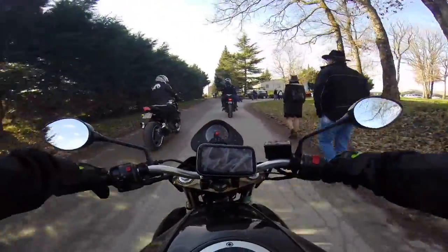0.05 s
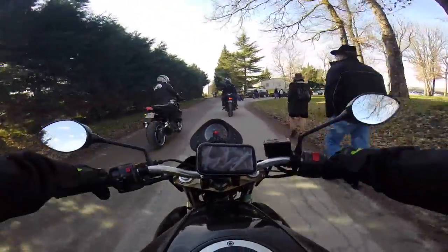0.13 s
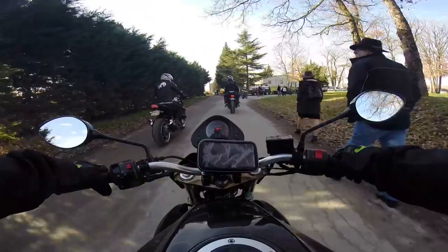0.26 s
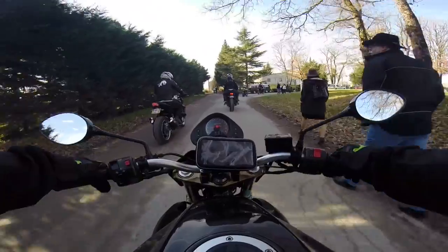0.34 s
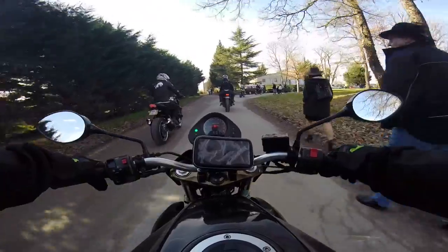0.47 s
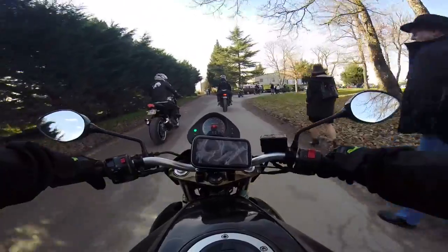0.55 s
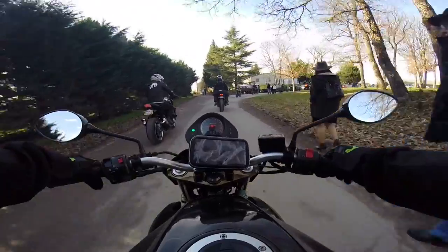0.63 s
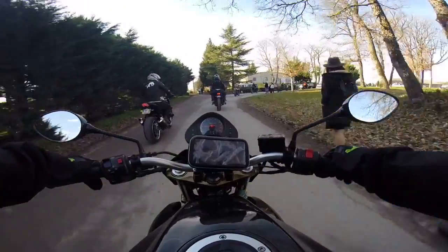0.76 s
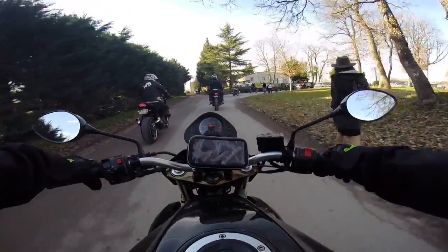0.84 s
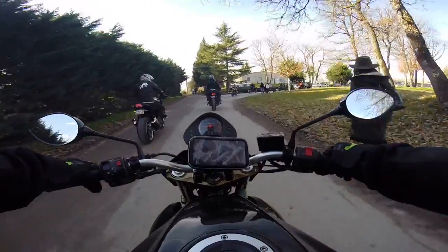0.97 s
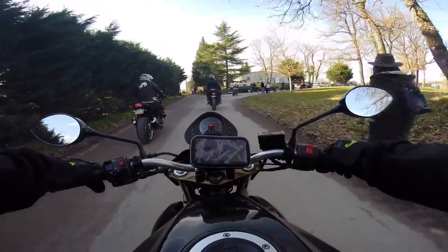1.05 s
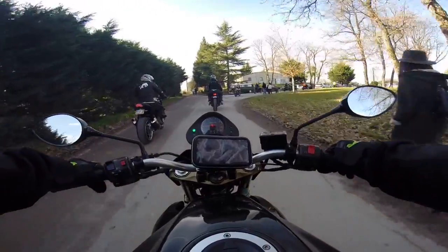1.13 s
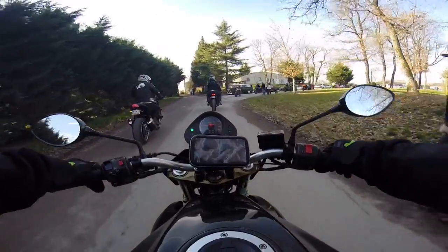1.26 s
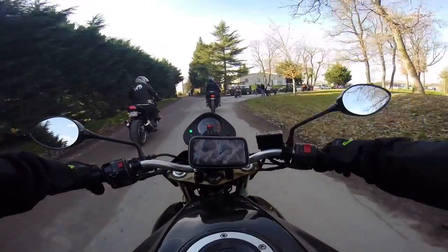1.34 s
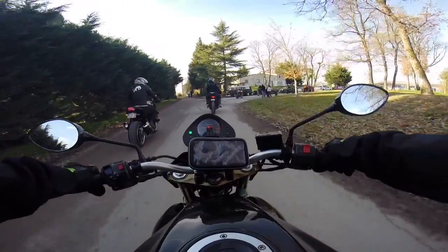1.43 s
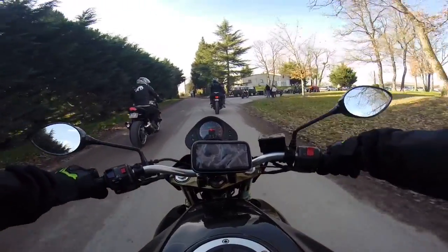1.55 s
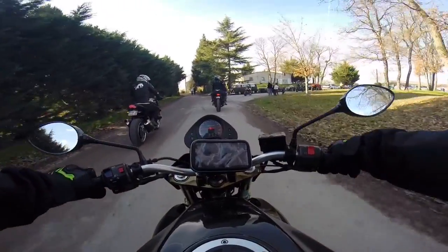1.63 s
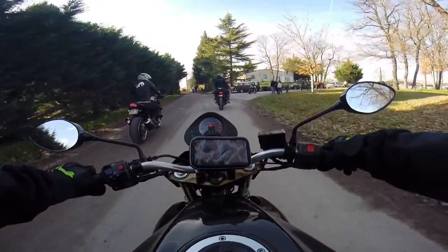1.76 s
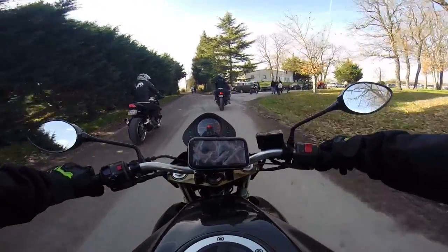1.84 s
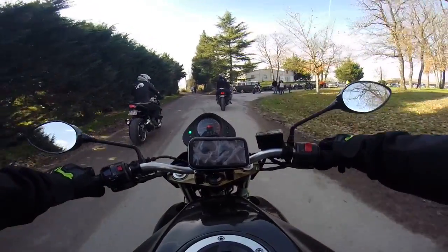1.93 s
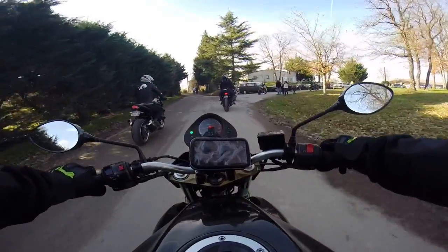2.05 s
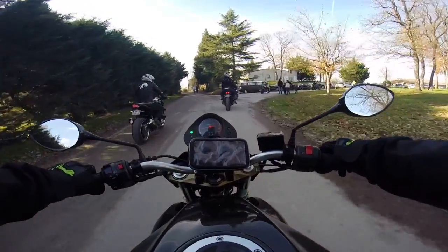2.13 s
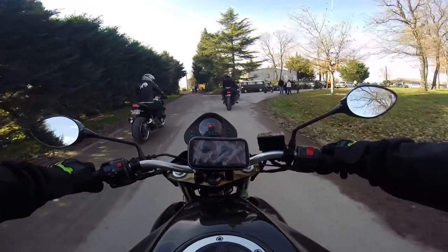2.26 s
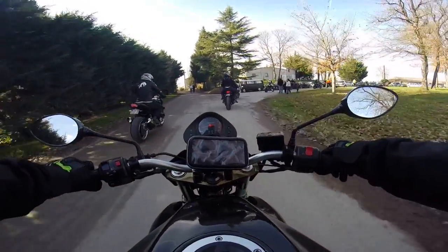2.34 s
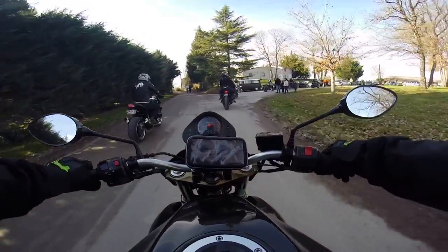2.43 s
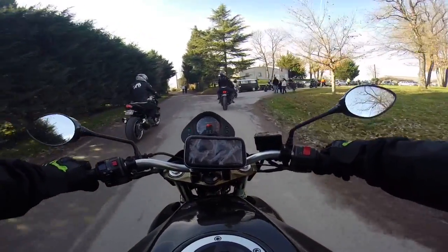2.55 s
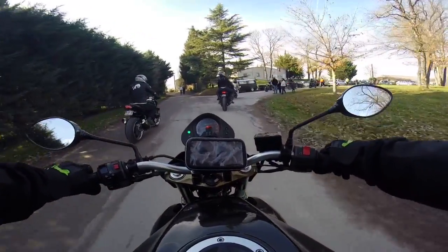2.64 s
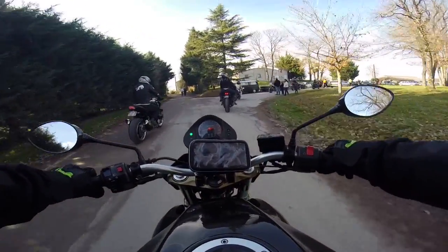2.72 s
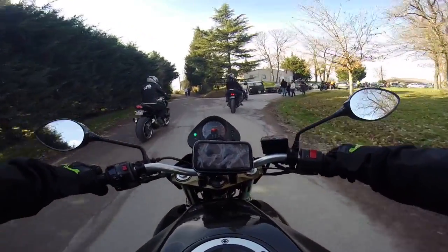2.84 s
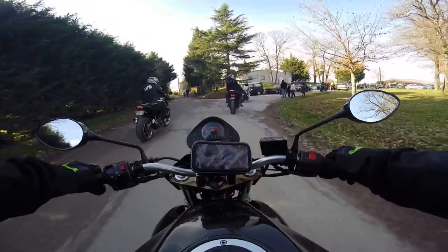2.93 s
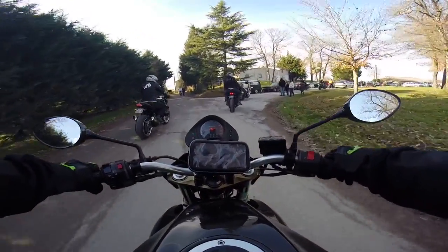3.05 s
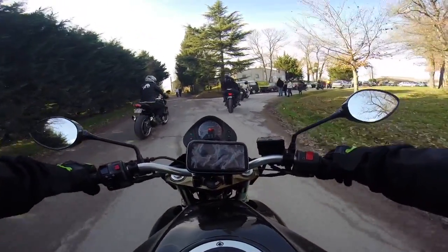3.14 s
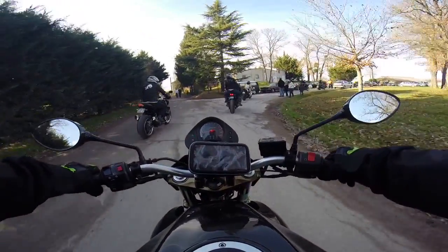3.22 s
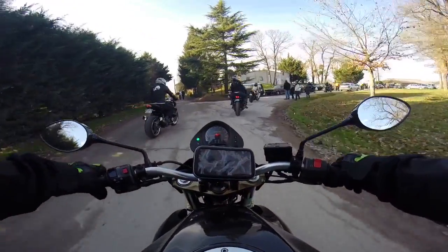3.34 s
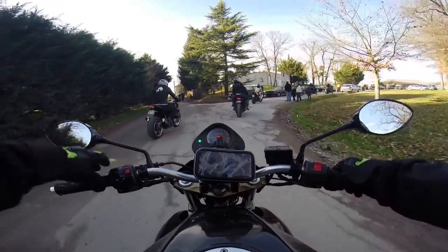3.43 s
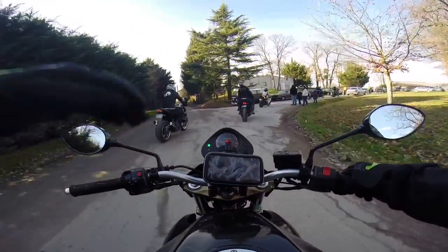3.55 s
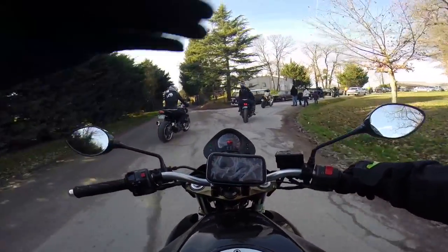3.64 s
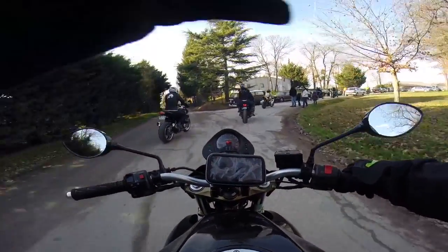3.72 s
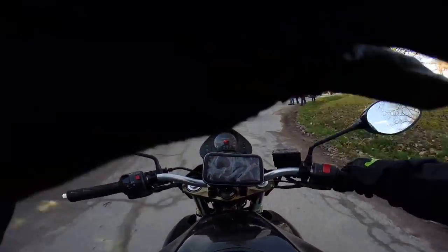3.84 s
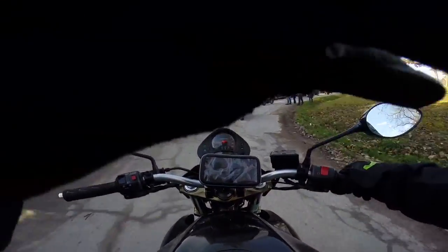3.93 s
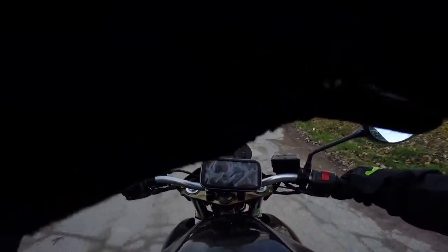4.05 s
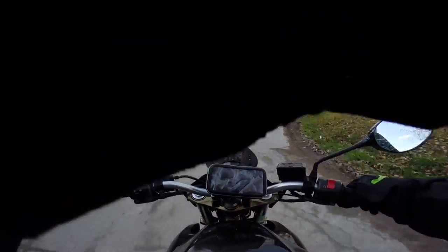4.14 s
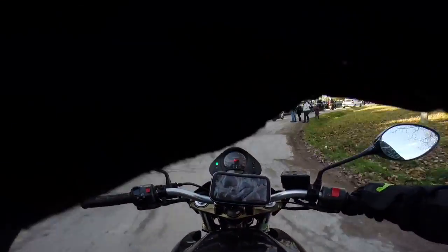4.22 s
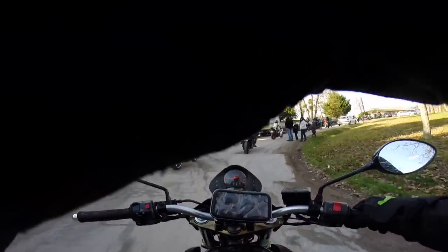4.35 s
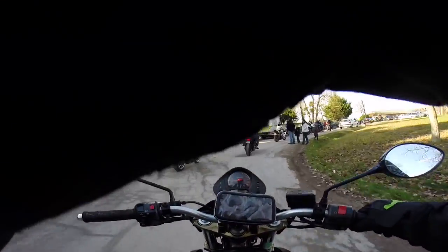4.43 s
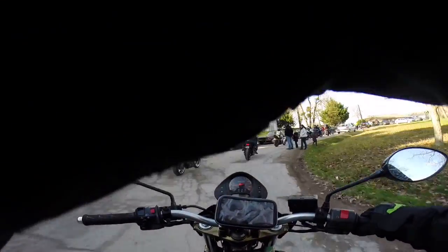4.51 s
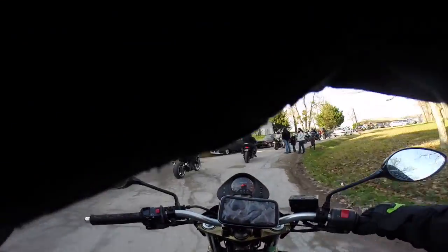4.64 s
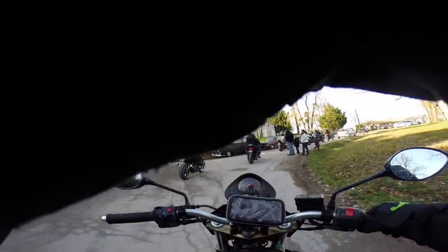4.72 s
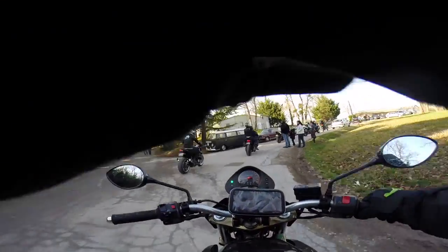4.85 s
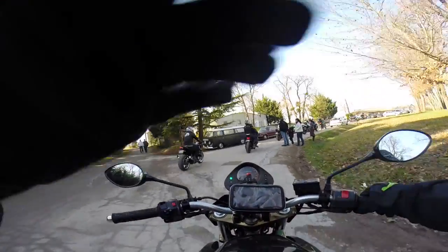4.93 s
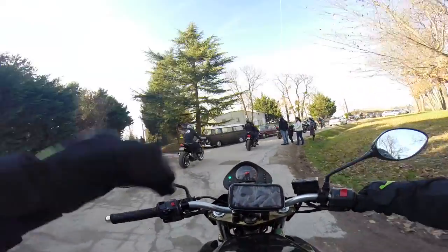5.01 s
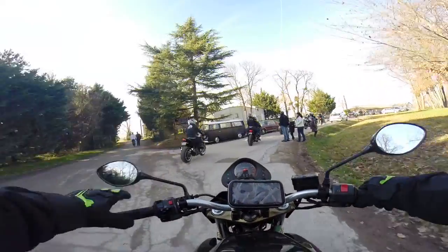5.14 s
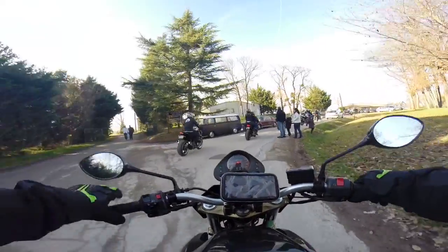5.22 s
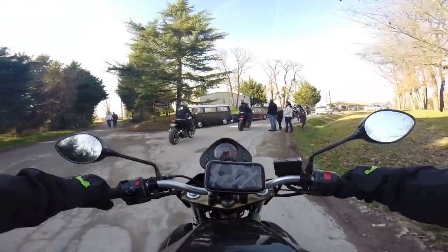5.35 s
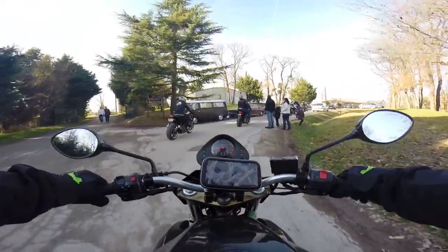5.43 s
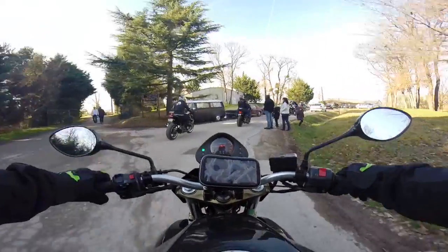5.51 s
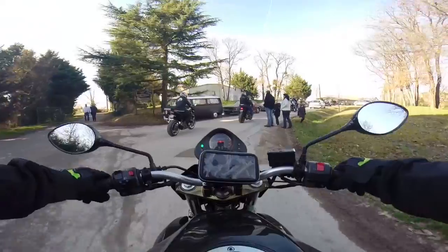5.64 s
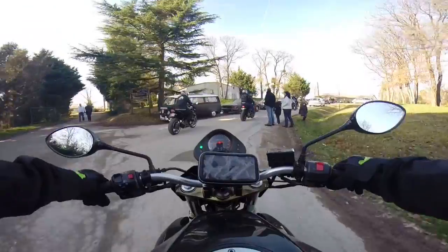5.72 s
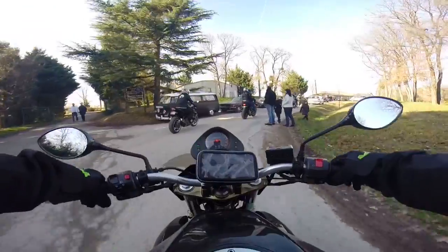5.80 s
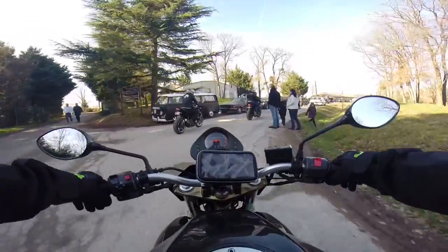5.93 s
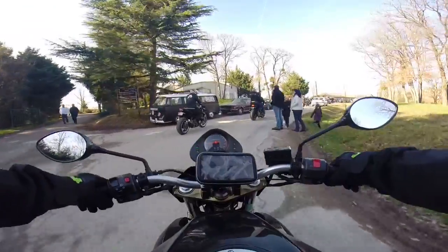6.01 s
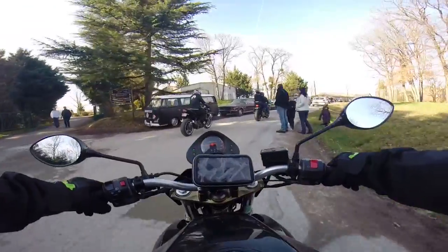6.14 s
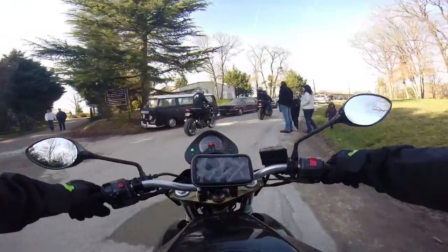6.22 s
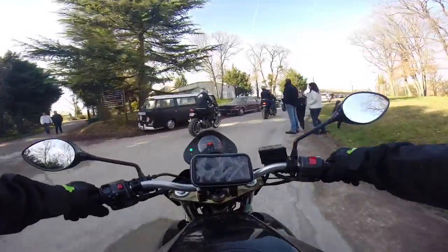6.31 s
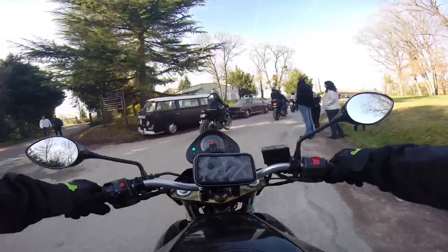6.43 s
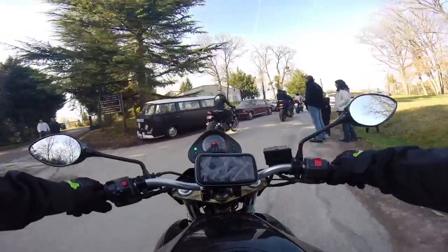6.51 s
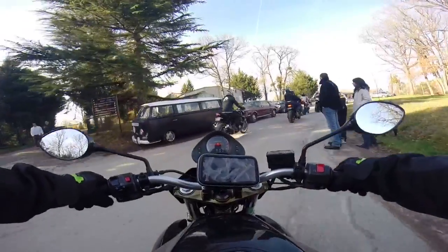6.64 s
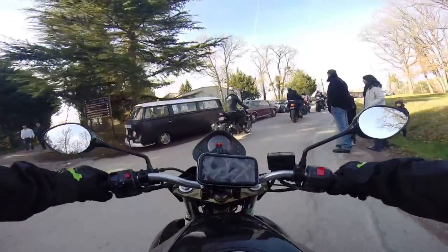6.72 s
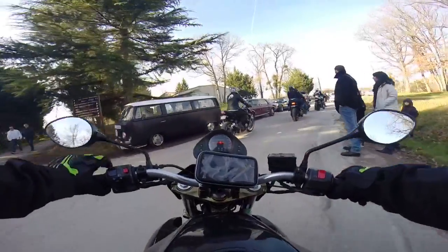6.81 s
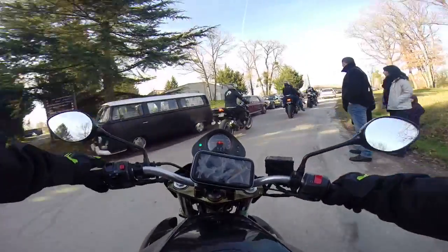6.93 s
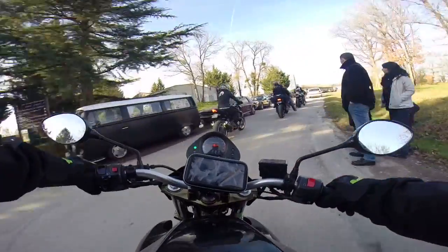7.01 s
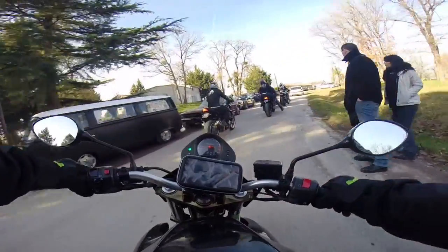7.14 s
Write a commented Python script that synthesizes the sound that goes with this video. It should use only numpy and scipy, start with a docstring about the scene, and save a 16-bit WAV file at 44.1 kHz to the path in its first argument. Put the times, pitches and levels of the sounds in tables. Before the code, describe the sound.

From a microphone on a rider's chest outdoors, several motorcycles burble at low speed under wind rumble and hiss, with a fast ticking rattle. Small bumps knock the mount early. A glove begins rubbing around three seconds, then just before four a huge overloaded thump, sharp plastic clicks and pops drown the ride, which goes muffled. The engines return after five seconds, with a faint thin whistle, more rubbing and a few clicks.

```python
"""A camera on a rider's chest hears engines (stacked tones and exhaust puffs), wind (filtered noise) and clatter.
One engine is heard only for the first half second; then bumps knock the mount (short swings) and a motorcycle
ahead joins in. A gloved hand starts to rub (bursts of noise) and click the plastic case (ringing tones), with
squeaks. Near 4 s the palm presses the microphone port and seals it (pressure pulses, dips in level); stiff fabric
prickles. From 5 s a thin whistle (a pure tone) sounds three times while the ride comes back and the hand rubs on."""
import sys
import numpy as np
from scipy import signal
from scipy.fft import rfft, irfft, next_fast_len
from scipy.io import wavfile
from scipy.ndimage import uniform_filter1d

SR = 44100
rng = np.random.default_rng(int(sys.argv[2]) if len(sys.argv) > 2 else 0)


def unload_audio(sound):
    """Save the sound as a 16-bit wav file, at the path given as the first command line argument."""
    columns = np.transpose(np.atleast_2d(sound))
    # keep every value between -1 and 1, then stretch to whole-number steps
    steps = np.round(np.clip(columns, -1, 1) * 32767)
    wavfile.write(sys.argv[1], SR, steps.astype(np.int16))


def decibels_to_gain(level_db):
    """Convert a level in decibels to a linear amplitude gain (20 dB per decade)."""
    exponent = np.asarray(level_db, float) / 20
    return 10 ** exponent


N = 316197
T = np.arange(N) / SR
SIZE = next_fast_len(N)
HZ = np.arange(SIZE // 2 + 1) * SR / SIZE + 1e-3  # just above 0, so that its logarithm exists

# Levels of the ride are those before its swells and the outside level. Rise, fall and width are bell widths.
# The rider's own engine. Each row: time in seconds, mean firing rate in Hz, level in dB.
OWN_ENGINE = [(0, 51.79, -39.5), (.9, 50.34, -39), (1.5, 52.14, -39), (2, 52.25, -31.5),
              (2.3, 51.06, -33.5), (2.6, 50.35, -39), (3, 51.15, -32.5), (3.35, 53.96, -33.5),
              (3.7, 63.27, -36), (4.2, 58, -38.5), (4.7, 53.87, -25.5), (5.2, 53.5, -48),
              (5.55, 62.8, -37.5), (5.75, 61.66, -45), (5.95, 61.15, -46), (6.2, 60.86, -39.5),
              (6.6, 60.55, -40.5), (6.85, 59.9, -49), (7, 60.05, -43), (7.17, 60.4, -41)]
# Its tones. Each row: multiple of the firing rate, level in dB against the engine level.
OWN_TONES = [(1 / 2, -16), (0.97, 0), (3 / 2, -9), (2, -3.5), (5 / 2, -9.5), (3, -10.5), (7 / 2, -18.5),
             (4, -13.5), (9 / 2, -14.5), (5.4, -14), (6, -17.5)]
# Another engine, heard only for the first half second. Each row: time in seconds, mean firing rate in Hz,
# level in dB.
EARLY_ENGINE = [(0, 55.53, -44.5), (.2, 54.8, -45), (.45, 55.44, -41)]
# Its tones. Each row: multiple of the firing rate, level in dB against the engine level.
EARLY_TONES = [(2, -20), (3, 3.5), (4, -1.5), (5, 1), (6, -1), (7, -8.5)]
# Beat of a loose part on a neighbouring engine. Each row: time in seconds, beats per second in Hz.
LOOSE_BEAT = [(0, 13.8), (.25, 14.5), (.5, 14.85), (.85, 15.65), (1.15, 16.7), (1.4, 17.3), (1.65, 16.8),
              (2.1, 14.2), (2.8, 12.5), (3.6, 14.14), (5.2, 14.6), (5.7, 16.6), (5.9, 16), (6.4, 17.3),
              (7.17, 16.5)]
# Exhaust of that neighbour. Each row: time in seconds, level at 4 times the beat in dB, at 5 times in dB.
NEIGHBOUR_DRONE = [(0, -52, -51), (.5, -45, -38.5), (.8, -40, -36), (1.15, -37, -41), (1.45, -39, -46),
                   (1.8, -45, -58), (5.4, -55, -60), (5.9, -56, -41), (6.2, -34.5, -36), (6.5, -35.5, -43),
                   (6.75, -44, -46), (7.17, -45, -46)]
# Its tones. Each row: multiple of either drone pitch, level in dB against that drone.
DRONE_TONES = [(1, 0), (2, -7.5), (3, -13.5)]
# Rings of the loose part. Each row: time in seconds, then the levels in dB of the 1.5 kHz beat,
# the 1.1 kHz ring and the steady 1.5 kHz buzz.
LOOSE_LEVELS = [(0, -56, -55, -61), (.3, -51, -53.5, -60), (.6, -51, -56, -60), (.9, -49.5, -62, -57),
                (1.2, -49.5, -59, -58), (1.45, -45.5, -51.5, -55), (1.62, -51, -57, -49),
                (1.8, -53.5, -62, -53), (2.3, -57, -64, -54), (2.8, -59, -70, -54), (3.2, -57, -51.5, -56),
                (3.85, -64, -52.5, -54), (4.3, -71, -60.5, -55), (5.1, -60, -49.5, -55),
                (5.45, -52, -58, -53), (5.85, -49.5, -61, -52.5), (6.15, -54, -53.5, -53),
                (6.35, -54, -64, -51), (6.6, -54, -53, -51), (6.95, -56, -63, -51), (7.17, -65, -67, -54)]
# Colour of the wind. Each row: frequency in Hz, relative level in dB.
WIND_COLOUR = [(3.5, -49), (6.0, -25), (16, -21), (31, -7.5), (44, -3.5), (155, -5), (260, -6),
               (453, -18.5), (638, -22.5), (861, -28.5), (1000, -26), (1300, -31.5), (2200, -120)]
# Gusts buffeting the port. Each row: time in seconds, dB over the wind, width in ms.
GUSTS = [(.76, 7, 22), (.86, 7, 26), (3.26, 4.5, 16), (4.36, 10.5, 28.6), (5.6, 9, 31), (6.15, 7, 36),
         (6.8, 3.5, 71)]
# Colour of the road hiss. Each row: frequency in Hz, relative level in dB.
HISS_COLOUR = [(350, -34), (600, -5), (801, -9), (1100, -7), (1230, -9), (1510, -1.5), (1900, -5.5),
               (2210, -7), (4160, -6.5), (8390, -27.5), (9490, -30), (13400, -39), (16000, -46)]
# Resonances of the case in the hiss. Each row: frequency in Hz, width in Hz, dB over the hiss.
CASE_PEAKS = [(805, 100, -5.5), (1112, 49, 7.5), (1510, 230, 1.5), (2182, 330, 7), (2750, 210, 4),
              (4170, 270, 2.5), (5600, 350, 5), (6500, 220, 5), (7320, 570, 3.5), (8600, 600, -2.5),
              (9400, 500, 7)]
# Level of everything from outside; it drops after 4.3 s and recovers by 5.7 s.
# Each row: time in seconds, level in dB.
OUTSIDE_LEVEL = [(0, -0.5), (1.6, -1), (2.6, -3), (3.6, -1.5), (4.3, -0.5), (4.42, -6.5), (4.53, -14.5),
                 (4.78, -14.5), (5.05, -11), (5.4, -4), (5.7, 0), (6.5, 0.5), (7.17, -0.5)]
# The motorcycle ahead. Each row: time in seconds, mean firing rate in Hz, level in dB.
AHEAD_ENGINE = [(.7, 41.46, -30), (1, 41.8, -36), (1.4, 41.94, -42.5), (1.9, 41.6, -33.5),
                (2.3, 42.55, -35), (2.5, 44.5, -34), (2.75, 47.34, -35), (2.95, 44.1, -36.5),
                (3.15, 36.27, -38), (3.45, 37.62, -35.5), (3.7, 39.1, -39.5), (4.2, 40.6, -43),
                (4.6, 50.2, -50), (4.95, 54.14, -39.5), (5.25, 53.22, -50), (5.75, 40.6, -36.5),
                (6.55, 41.29, -57), (6.8, 44.15, -41.5), (7.17, 45.8, -37)]
# Its tones. Each row: multiple of the firing rate, level in dB against the engine level.
AHEAD_TONES = [(1, -29), (2, -6.5), (3, -3), (4, -4), (5, -7.5), (6, -9), (7, -14.5), (8, -20.5)]
# Knocks through the mount at a bump. Each row: time in seconds, peak in dB, swing frequency in Hz.
BUMP_KNOCKS = [(0.7234, -20, 170), (.739, -19, 192), (0.7532, -18, 240), (.765, -16, 229),
               (0.8434, -21.5, 260), (.8635, -22, 230), (.8775, -20, 250), (5.592, -16.5, 170),
               (5.783, -22, 190)]
# Sleeve dragging on the housing. Each row: time in seconds, noise level before its filter in dB, width in ms.
SLEEVE_DRAGS = [(.85, -27, 6), (.878, -25, 4.4), (3.42, -28.5, 31), (3.66, -34.5, 39), (3.937, -14, 8.9),
                (5.44, -48, 40), (6.75, -24, 18)]
# Glove sliding. Each row: time in seconds, noise level before its filter in dB, rise in ms, fall in ms,
# guide frequency of the filter in Hz.
GLOVE_RUBS = [(.86, -39, 18, 12, 4500), (1.87, -40, 19, 23, 2200), (3.39, -35, 64, 44, 2200),
              (3.42, -45, 46, 40, 4500), (3.63, -37.5, 52, 47, 2520), (3.91, -26, 1.52, 4.55, 3960),
              (3.924, -17, 3.5, 11.2, 3500), (3.975, -32.5, 19, 11, 2370), (4.07, -28.5, 39, 36, 2920),
              (4.075, -46, 26.7, 23, 5430), (4.24, -35, 30, 15, 2200), (4.365, -27, 18, 16, 2360),
              (4.44, -44, 9.3, 9.9, 2600), (4.459, -28.5, 21, 11.6, 2800), (4.46, -45, 12, 9.1, 3900),
              (4.551, -45, 8.8, 6.9, 2300), (4.926, -27, 24, 12, 2640), (4.99, -43, 65, 36, 1800),
              (5.2, -39, 14.3, 12, 2200), (5.38, -38.5, 73, 23, 2036), (5.469, -31.5, 35.5, 4, 1930),
              (5.61, -27, 19, 8, 2304), (5.64, -22.5, 17, 24, 2374), (6.14, -29.5, 30, 29.6, 2200),
              (6.34, -33, 28.7, 21, 2200), (6.385, -35, 10, 10, 1900), (6.595, -30, 12, 14, 1800),
              (6.69, -33, 20, 15, 2000), (6.75, -31, 18, 22, 2200), (6.855, -33, 10, 10, 2600),
              (6.905, -31, 16, 14, 2200)]
# Resonances of the case in the rubbing. Each row: frequency in Hz, width in Hz, boost in dB.
CLOTH_PEAKS = [(1500, 850, 12.5), (2200, 260, 4), (2760, 680, 9.5), (3340, 220, 2), (3840, 400, 4.5),
               (4540, 410, 8.5), (5340, 500, -9), (6360, 3500, 16.5), (7260, 240, 0)]
# A seam scraping over an edge. Each row: time in seconds, level in dB, rise in ms, fall in ms.
SEAM_SCRAPES = [(3.911, -33, 1.7, 4.6), (3.925, -19.5, 3.3, 7.5), (4.07, -36, 30.7, 30),
                (4.455, -46, 15, 12.3), (4.92, -41, 15, 14), (5.635, -49, 28, 25)]
# Colour of the seam. Each row: frequency in Hz, relative level in dB.
SEAM_COLOUR = [(2500, -55), (5000, 3.5), (7000, 3.5), (9000, -15.5), (14500, -26), (16500, -53)]
# Clicks of the case. Each row: time in seconds, peak in dB, centre in Hz, crack in dB against the ring's peak.
CASE_CLICKS = [(.8614, -36, 1510, -9), (3.3178, -23, 2270, -13), (3.428, -31, 1590, -13),
               (3.9038, -19.5, 1624, -18), (4.2159, -5, 3600, -1.5), (4.2828, -18, 2150, -3.5),
               (4.3205, -31, 1500, -15), (4.357, -4.5, 2700, -6), (4.3762, -14, 2030, 0.5),
               (4.3788, -20, 2400, -3), (4.3867, -17, 2610, -6.5), (4.4026, -25, 1900, -12),
               (4.4062, -40, 4500, -2), (4.4375, -37, 2595, -20), (4.5446, -39, 2400, -17),
               (4.5765, -38, 2400, -5), (4.594, -45, 1600, -13), (4.6166, -47, 1500, -17),
               (4.7302, -15.5, 3900, -1), (4.7627, -15, 3840, -2.5), (5.206, -39, 5405, 9),
               (5.278, -41, 5407, -1), (5.3761, -26, 2148, -14), (5.437, -28, 2101, -11),
               (5.479, -26, 2040, -16), (5.6193, -15, 2350, -19), (5.851, -30, 1500, -16),
               (6.1167, -36, 2200, 0), (6.323, -30, 1435, -1)]
# Ringing tones of the case. Each row: frequency in Hz, relative level in dB, time to fall 60 dB in seconds.
CASE_RINGS = [(1800, 11.5, 0.0045), (2200, -1, 0.015), (2700, 1, 0.0068), (3450, 1, 0.0085),
              (3900, 1, 0.0056), (4500, -1.5, 0.0059), (5350, 5, 0.007), (6180, 0.5, 0.0087),
              (8200, -18, 0.0055), (10200, -8, 0.0041)]
# Squeaks of fabric on plastic. Each row: time in seconds, level in dB, width in ms, centre in Hz.
FABRIC_SQUEAKS = [(1.87, -49.5, 19, 3900), (3.385, -45, 12, 3800), (3.42, -41, 12, 3950),
                  (3.478, -49, 9, 3950), (3.502, -46, 3, 4100), (3.975, -47, 9.8, 6200),
                  (3.912, -31, 2.3, 6400), (3.923, -25, 2, 2900), (3.9335, -22.5, 2.3, 2500),
                  (4.068, -31.5, 17, 3760), (4.065, -34.5, 16, 2900), (4.1, -34, 11, 2840),
                  (4.104, -36, 6, 3800), (4.065, -38, 23, 6300), (4.158, -37.5, 4.4, 2070),
                  (5.64, -38, 18, 3900), (4.462, -35, 6.5, 2940), (4.925, -34, 12, 2600),
                  (5.38, -41, 8, 2070), (5.475, -35.5, 7.5, 2030)]
# Palm pushing and pulling the air. Each row: time in seconds, pressure before the capsule (1 is full scale),
# rise in ms.
PALM_PRESSES = [(3.9, 0.14, 2.5), (3.914, -0.4, 3.1), (3.924, 0.9, 4.7), (3.935, -0.72, 5),
                (3.947, -0.28, 3.3), (4.19, -0.2, 4.1), (4.235, -0.11, 6.1), (4.27, 0.2, 13),
                (4.337, -0.26, 6.3), (4.48, -0.12, 6.8), (4.885, 0.16, 5), (4.9, 0.11, 8.5),
                (4.925, 0.02, 10), (4.949, -0.13, 2.2)]
# Pops as the palm lets go. Each row: time in seconds, pressure before the capsule (1 is full scale),
# rise in ms, fall in ms.
PALM_POPS = [(3.9399, -0.55, 0.67, 0.35), (3.9434, -0.9, 0.25, 0.2), (3.944, -0.43, 0.14, 0.3),
             (4.2083, -0.4, 0.37, 0.75), (4.3226, -0.1, 0.19, 0.35), (4.4057, -1.3, 1.5, 0.95),
             (4.5757, -2.0, 0.69, 0.72)]
# The palm closes the port. Each row: time in seconds, change in dB, closing in ms, opening in ms.
PALM_SEALS = [(3.95, -16, 1.9, 11), (4.4, -32, 4.9, 32), (4.6, -12, 4.8, 45)]
# A thin whistle. Each row: time in seconds, peak in dB, rise in ms, fall in ms, frequency in Hz.
WHISTLES = [(5.02, -63, 16, 52, 5020), (5.254, -62, 36, 20, 5060), (5.32, -54, 14, 11, 5120)]


def curve(table):
    """Joins each column of a table by straight lines in time."""
    s, *columns = np.transpose(table)
    return [np.interp(T, s, column) for column in columns]


def walk(rate):
    """Smooth random wandering with about so many new values a second and a spread near 1."""
    k = int(SR / rate)
    steps = np.repeat(rng.standard_normal(N // k + 1), k)
    return 1.3 * uniform_filter1d(uniform_filter1d(steps, k), k)[:N]


def slope(points):
    """Filter gain that joins (Hz, dB) points along a logarithmic pitch axis."""
    hz, db = np.transpose(points)
    return decibels_to_gain(np.interp(np.log(HZ), np.log(hz), db))


def humps(peaks):
    """Filter gain of resonances standing on a flat response."""
    return decibels_to_gain(sum(db / (1 + (2 * (HZ - hz) / width) ** 2) for hz, width, db in peaks))


def peak(hz, half_width):
    """Filter gain of one resonance alone."""
    return 1 / (1 + ((HZ - hz) / half_width) ** 2)


def shaped(x, gain):
    """Filters a sound by a gain, then scales it to rms 1."""
    y = irfft(rfft(x, SIZE) * gain, SIZE)[:N]
    return y / np.std(y)


def bandpass(x, low_hz, high_hz):
    """Keeps the part of a sound between two frequencies."""
    return signal.sosfilt(signal.butter(2, [low_hz, high_hz], "bandpass", fs=SR, output="sos"), x)


def highpass(x, hz):
    """Keeps the part of a sound above a frequency."""
    return signal.sosfilt(signal.butter(2, hz, "highpass", fs=SR, output="sos"), x)


def bell(s, rise_ms, fall_ms):
    """Sample positions around a moment and a bell with its own rise and fall."""
    i = np.arange(max(int((s - 0.15) * SR), 0), min(int((s + 0.15) * SR), N))
    ms = 1000 * (T[i] - s)
    return i, np.exp(-0.5 * (ms / np.where(ms < 0, rise_ms, fall_ms)) ** 2)


def swell(events):
    """A gain that leaves 1 in uneven bells of so many dB."""
    db = np.zeros(N)
    for s, peak_db, rise_ms, fall_ms in events:
        i, shape = bell(s, rise_ms, fall_ms)
        db[i] += peak_db * shape
    return decibels_to_gain(db)


def engine(table, tones, wobble, patchy_db, bark_share=0):
    """Tones at multiples of the firing rate; uneven burning makes each waver and swell on its own."""
    hz, db = curve(table)
    phase = 2 * np.pi * np.cumsum(hz * (1 + wobble * walk(12))) / SR
    present = 1.0 * (T >= table[0][0]) * (T <= table[-1][0])
    heard = uniform_filter1d(present, size=2000, mode="nearest")
    # the quieter the engine is under -36.5 dB, the more its upper tones stand out
    bark_db = bark_share * (-36.5 - db)
    total = np.zeros(N)
    for k, tone_db in tones:
        level_db = tone_db + patchy_db * walk(10) + (k >= 2) * bark_db * (2 / k) ** 1.4
        waver = 0.65 * walk(9)  # radians
        total += decibels_to_gain(level_db) * np.cos(k * phase + k * k * 0.082 + waver)
    return np.sqrt(2) * total * decibels_to_gain(db) * heard, phase


def strokes(phase):
    """Each firing pushes a puff of its own size out of the exhaust; alternate ones tend to be weaker."""
    count = np.floor(phase / (2 * np.pi))
    size_db = 5.0 * rng.standard_normal(N) - 2.5 * (count % 2)
    puffs = np.diff(count, prepend=0) * decibels_to_gain(size_db)
    low_cut = (HZ / 70) ** 2 / (1 + (HZ / 70) ** 2)
    return shaped(puffs, low_cut / (1 + (HZ / 270) ** 4)) * decibels_to_gain(-38.5)


def neighbour_drone():
    """Exhaust tones of the neighbouring engine at 4 and 5 times the beat of its loose part."""
    beat_hz, = curve(LOOSE_BEAT)
    total = np.zeros(N)
    for multiple, db in zip((4, 5), curve(NEIGHBOUR_DRONE)):
        table = np.c_[T, multiple * beat_hz, db]
        total += engine(table, DRONE_TONES, wobble=0.012, patchy_db=3.0)[0]
    return total


def wind(outside_db):
    """Eddies at the port: a rumble that wanders and an upper part that takes the gusts."""
    rumble_db, flutter_db = -36.5, -40.5
    rumble_share, flutter_share = 0.7, 0.87  # how much of the outside level each part follows
    eddies = rng.standard_normal(N) * decibels_to_gain(0.7 * walk(40))
    split = 1 / (1 + (HZ / 130) ** 4)
    upper_gain = slope(WIND_COLOUR) * (1 - split)
    rumble = shaped(eddies, slope(WIND_COLOUR) * split)
    rumble *= decibels_to_gain(rumble_db + rumble_share * outside_db + 2.8 * walk(5.02))
    extra = swell([(s, db, ms, ms) for s, db, ms in GUSTS]) - 1
    gusts = shaped(eddies, upper_gain / (1 + (HZ / 600) ** 4)) * extra
    return rumble + (shaped(eddies, upper_gain) + gusts) * decibels_to_gain(flutter_db + flutter_share * outside_db)


def road_hiss(phase, outside_db):
    """Noise puffed by the firings, coloured by the case, flickering separately in octave bands."""
    puffed = rng.standard_normal(N) * (1 + 0.14 * np.cos(phase))
    noise = rfft(puffed, SIZE) * slope(HISS_COLOUR) * humps(CASE_PEAKS)
    dull_db = 0.35 * np.minimum(outside_db + 4.5, 0)  # extra loss in the treble
    hiss = np.zeros(N)
    for low in 600 * 2.0 ** np.arange(6):
        band = irfft(noise * (HZ >= low) * (HZ < 2 * low), SIZE)[:N]
        hiss += band * decibels_to_gain(1.14 * walk(25) + (low > 4000) * dull_db)
    return hiss / np.std(hiss) * decibels_to_gain(-44)


def loose_part():
    """A loose part chirps once a beat and rings its resonances in turn, over a steady buzz."""
    cycle = 2 * np.pi * np.cumsum(curve(LOOSE_BEAT)[0]) / SR + 0.75
    taps = np.diff(np.floor(cycle / (2 * np.pi)), prepend=0) * decibels_to_gain(1.4 * walk(24))
    rattle = rng.standard_normal(N) * np.exp(2.1 * (np.cos(cycle) - 1))
    chirp_hz = 1510 * (1 + 0.016 * walk(20) + 0.012 * np.sin(cycle))
    ring = 2 * np.pi * np.cumsum(chirp_hz) / SR
    pulse = np.exp(3.4 * (np.cos(cycle) - 1)) * decibels_to_gain(0.89 * walk(16))
    chirp = (np.sin(ring) + 0.4 * np.sin(1.43 * ring)) * pulse
    struck = shaped(18 * taps + rattle, peak(1510, 60) + 0.8 * peak(2150, 90))
    tick = chirp / np.std(chirp) + 0.3 * struck
    # the lower ring is strongest between the chirps
    hum = shaped(rng.standard_normal(N) * (1 - 0.6 * np.cos(cycle)), peak(1105, 45))
    buzz = shaped(rng.standard_normal(N) * decibels_to_gain(1.5 * walk(45)), peak(1510, 90))
    tick_db, hum_db, buzz_db = curve(LOOSE_LEVELS)
    return tick * decibels_to_gain(tick_db) + hum * decibels_to_gain(hum_db) + buzz * decibels_to_gain(buzz_db)


def knocks():
    """One short swing of the mount for each knock as the wheels cross a bump."""
    out = np.zeros(N)
    for s, db, hz in BUMP_KNOCKS:
        period_ms = 1000 / hz
        i, shape = bell(s, 0.3 * period_ms, 0.45 * period_ms)
        out[i] += decibels_to_gain(db) * shape * np.cos(2 * np.pi * hz * (T[i] - s))
    return out


def rubs(outside_db):
    """Fabric catches and slips: a noise band per stroke, with scrape above, body below and seam scrapes."""
    slips_per_s, drag_hz = 900, 706
    when, size = rng.random((2, N))
    slips = (when < slips_per_s / SR) * decibels_to_gain(5 - 2.5 * np.log(size + 0.02))
    grain = (rng.standard_normal(N) + slips) * decibels_to_gain(2.2 * walk(400) + 1.5 * walk(130))
    cloth = shaped(grain, humps(CLOTH_PEAKS) / (1 + (HZ / 8300) ** 6))
    scrape = decibels_to_gain(-20.5) * highpass(cloth, 5200)
    body = decibels_to_gain(0.8 * outside_db) * bandpass(cloth, 420, 1100)
    sides = scrape + body
    seam = shaped(grain, slope(SEAM_COLOUR))
    drags = [(s, db, ms, ms, drag_hz) for s, db, ms in SLEEVE_DRAGS]
    out = np.zeros(N)
    for s, db, rise_ms, fall_ms, hz in GLOVE_RUBS + drags:
        i, shape = bell(s, rise_ms, fall_ms)
        band = bandpass(cloth[i], hz / 2.07, hz * 1.196)
        out[i] += decibels_to_gain(db) * shape * (band + (hz != drag_hz) * sides[i])  # drags have no sides
    for s, db, rise_ms, fall_ms in SEAM_SCRAPES:
        i, shape = bell(s, rise_ms, fall_ms)
        out[i] += decibels_to_gain(db) * shape * seam[i]
    return out


def clicks():
    """A snap rings the case, mostly near the click's centre; a crack of noise goes with it."""
    out, t = np.zeros(N), T[:1500]
    hz, db, t60 = np.array(CASE_RINGS).T[:, :, None]
    soft = signal.butter(2, 8500, fs=SR, output="sos")
    for s, peak_db, centre_hz, crack_db in CASE_CLICKS:
        near_db = db - 15 * np.abs(np.log2(hz / centre_hz))  # 15 dB less per octave away
        start = np.pi * np.arange(len(hz))[:, None] + 0.5 * rng.random(hz.shape)
        tones = decibels_to_gain(near_db) * np.sin(2 * np.pi * hz * t + start) * 1000.0 ** (-t / t60)
        ring = np.sum(tones, axis=0) * (1 - np.exp(-t / 0.00028))
        crack = signal.sosfilt(soft, rng.standard_normal(len(t))) * np.exp(-t / 0.00054)
        hit = highpass(ring / np.max(np.abs(ring)) + decibels_to_gain(crack_db) * crack, 1100)
        i = int(s * SR)
        out[i:i + len(t)] += decibels_to_gain(peak_db) * hit / np.max(np.abs(hit))
    return out


def squeaks():
    """Fabric on plastic: noise in one narrow resonance for each squeak."""
    sharpness = 7.3  # centre over width
    noise, out = rng.standard_normal(N), np.zeros(N)
    for s, db, ms, hz in FABRIC_SQUEAKS:
        i, shape = bell(s, ms, ms)
        tone = bandpass(noise[i], hz * (1 - 0.5 / sharpness), hz * (1 + 0.5 / sharpness))
        out[i] += decibels_to_gain(db) * shape * tone / np.std(tone)
    return out


def prickle(outside_db):
    """Tiny bright snaps of stiff fabric, about 200 a second, once the hand is on the move."""
    when, size = rng.random((2, N))
    size_db = -59 - 3 * np.log(size + 1e-9) + outside_db
    snaps = (when < 200 / SR) * (T > 3.85) * decibels_to_gain(size_db)
    return bandpass(snaps, 5000, 13000)


def presses():
    """The palm moves air at the port: each pulse has a round rise, then the air leaks back."""
    pushes = [(s, size, ms, 1.7 * ms) for s, size, ms in PALM_PRESSES]
    out = np.zeros(N)
    for s, size, rise_ms, fall_ms in pushes + PALM_POPS:
        i, shape = bell(s, rise_ms, fall_ms)
        leak_back = 1 / np.cosh(np.clip(1000 * (T[i] - s) / fall_ms, 0, 50))
        out[i] += size * np.where(T[i] < s, shape, leak_back)
    return out


def seals():
    """The palm covers the port: a gain that briefly dips for everything from outside."""
    return swell(PALM_SEALS)


def whistle():
    """Short swells of one thin pure tone."""
    out = np.zeros(N)
    for s, db, rise_ms, fall_ms, hz in WHISTLES:
        i, shape = bell(s, rise_ms, fall_ms)
        out[i] += decibels_to_gain(db) * shape * np.sin(2 * np.pi * hz * T[i])
    return out


def scene():
    """Adds engines, wind, clatter, hand and whistle at one microphone."""
    outside_db, = curve(OUTSIDE_LEVEL)
    own, phase = engine(OWN_ENGINE, OWN_TONES, wobble=0.007, patchy_db=2.2, bark_share=0.85)
    early = engine(EARLY_ENGINE, EARLY_TONES, wobble=0.0024, patchy_db=0.0)[0]
    ahead = engine(AHEAD_ENGINE, AHEAD_TONES, wobble=0.00476, patchy_db=1.5)[0]
    engines = own + strokes(phase) + early + neighbour_drone() + ahead
    clatter = road_hiss(phase, outside_db) + loose_part()
    ride = (engines + clatter) * decibels_to_gain(outside_db) + wind(outside_db)
    hand = rubs(outside_db) + clicks() + squeaks() + prickle(outside_db) + presses()
    return (ride * seals() + knocks() + hand + whistle())[None]


def roll_off(x):
    """The treble ends steeply here."""
    return signal.sosfilt(signal.butter(12, 16500, fs=SR, output="sos"), x)


def record(dry):
    """The capsule overloads, the top is dulled and steady pressure leaks away."""
    limit, knee = 1.08, 13.0  # a higher knee bends more sharply at the limit
    squeezed = dry / (1 + np.abs(dry / limit) ** knee) ** (1 / knee)
    dull = signal.butter(4, 15300, fs=SR, output="sos")
    leak = signal.butter(1, 20.9, "highpass", fs=SR, output="sos")
    mix = np.clip(signal.sosfilt(np.vstack([dull, leak]), squeezed), -1, 1)
    return roll_off(mix)


dry = scene()
out = record(dry)
unload_audio(out)
```